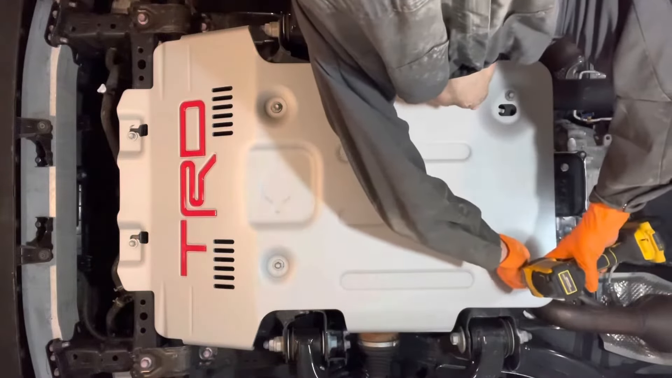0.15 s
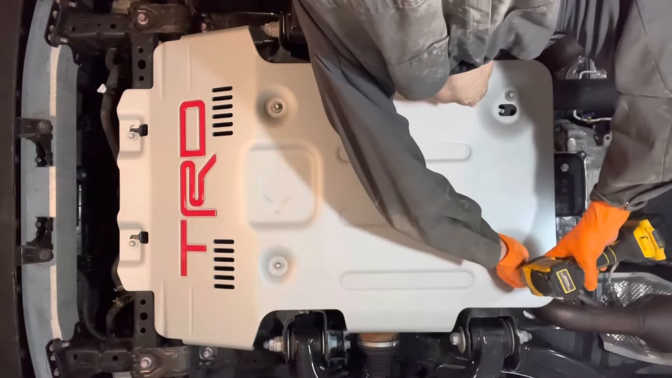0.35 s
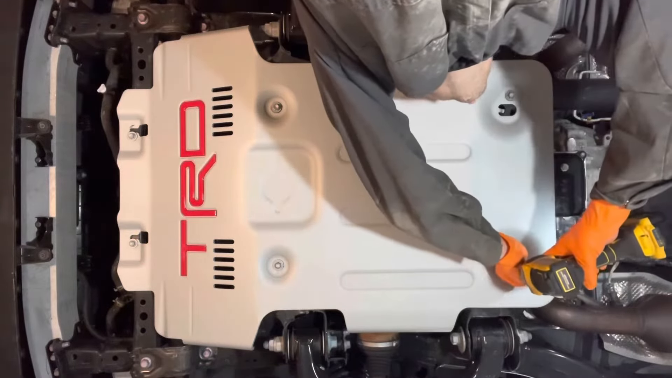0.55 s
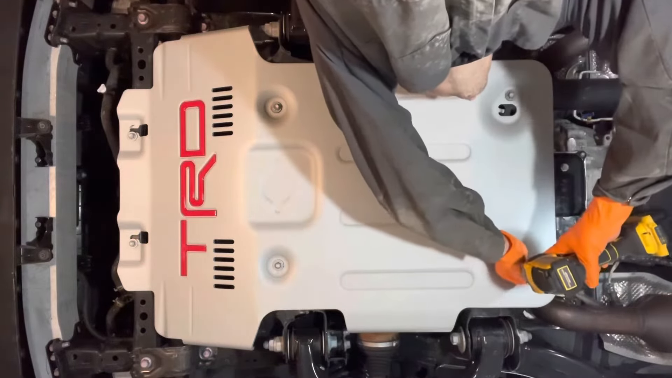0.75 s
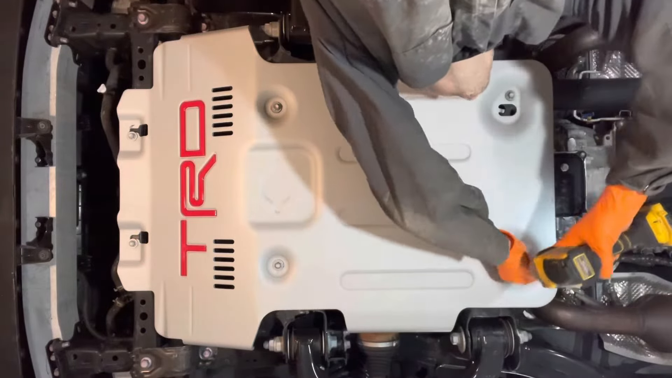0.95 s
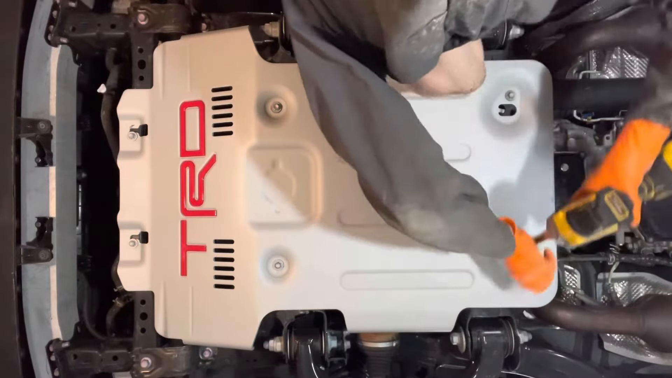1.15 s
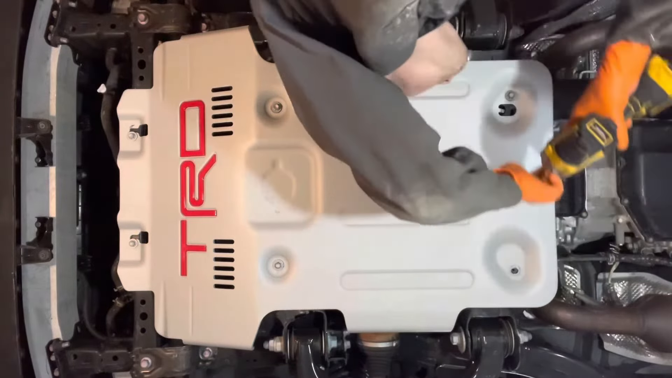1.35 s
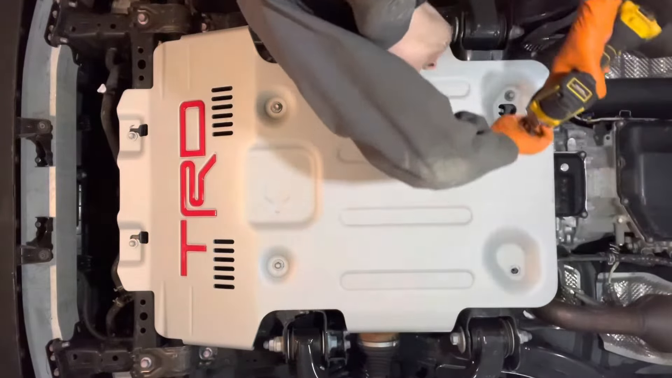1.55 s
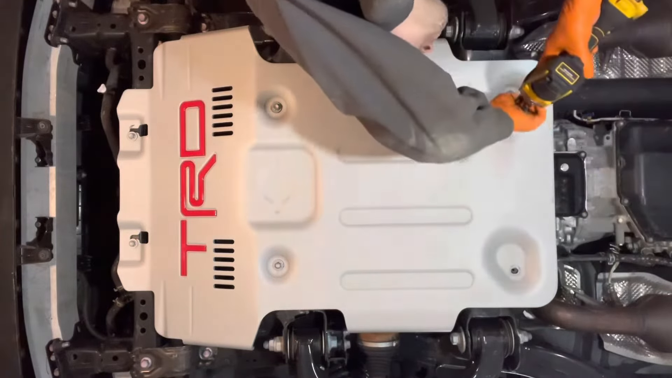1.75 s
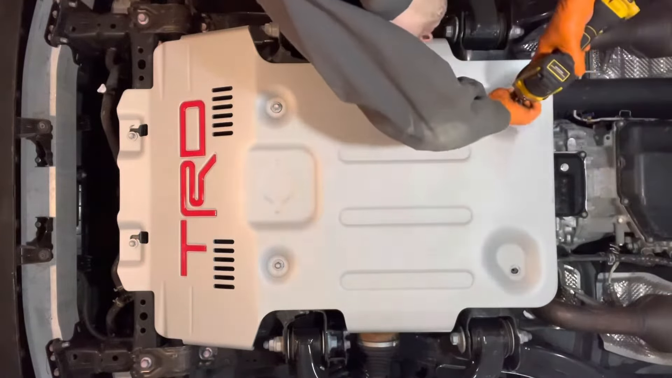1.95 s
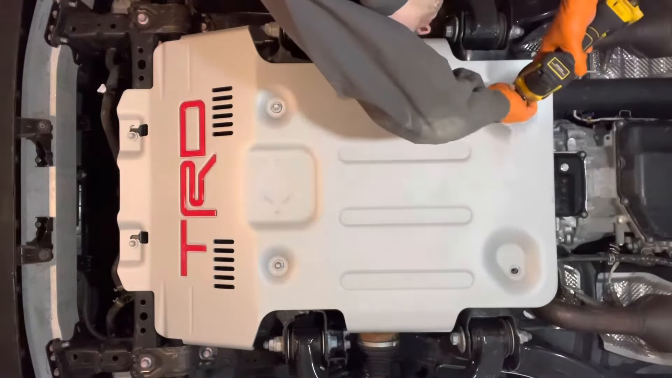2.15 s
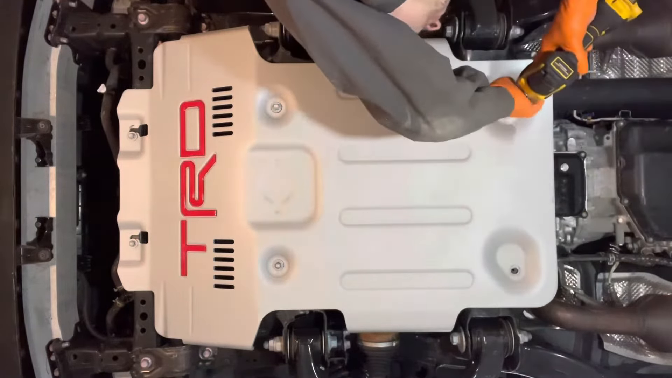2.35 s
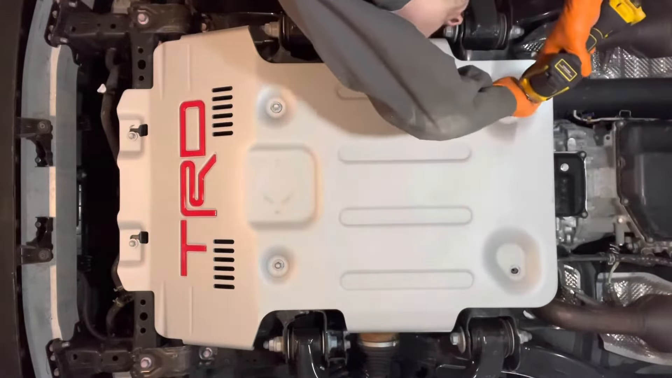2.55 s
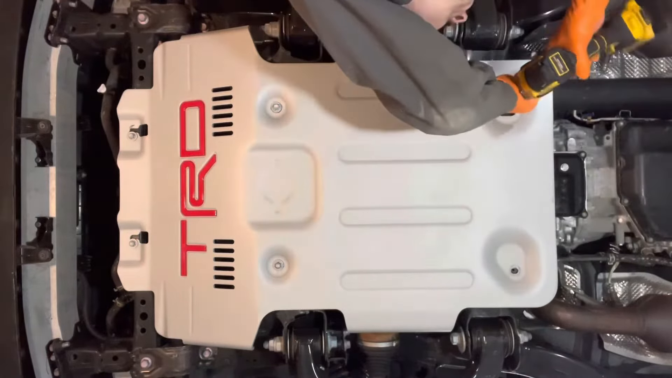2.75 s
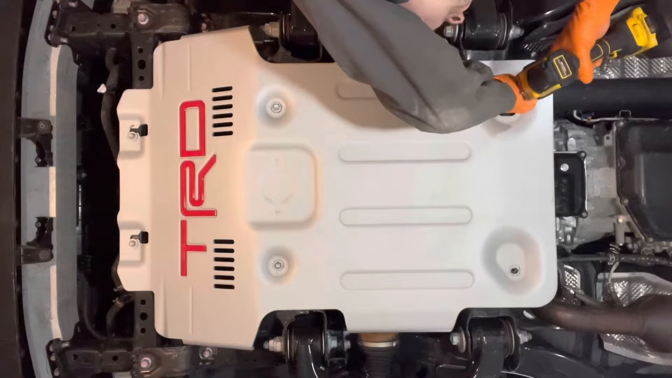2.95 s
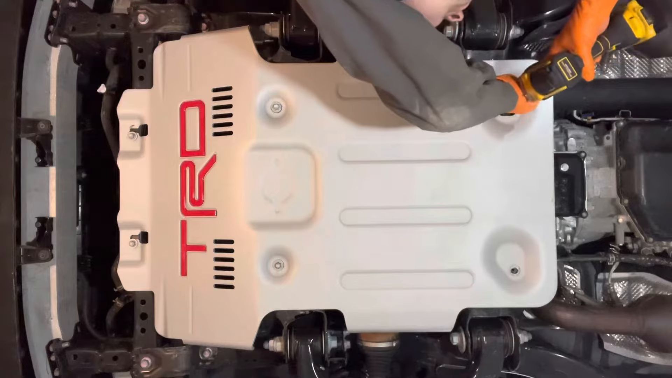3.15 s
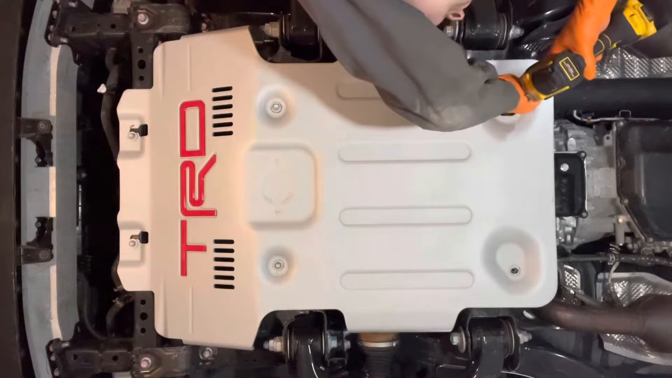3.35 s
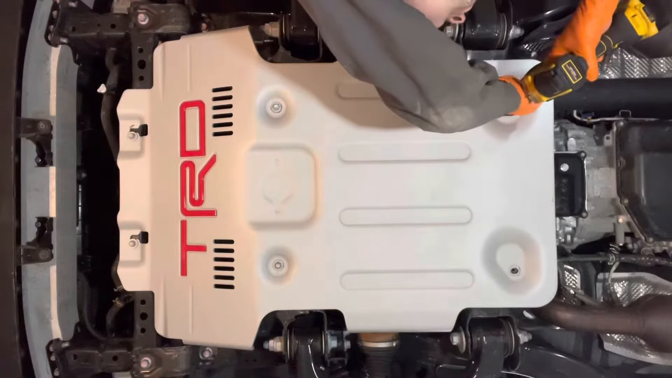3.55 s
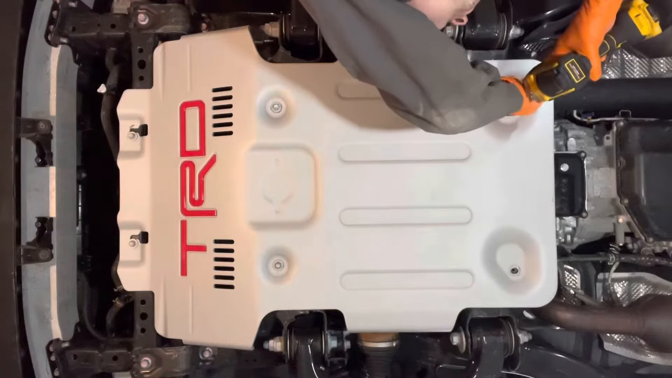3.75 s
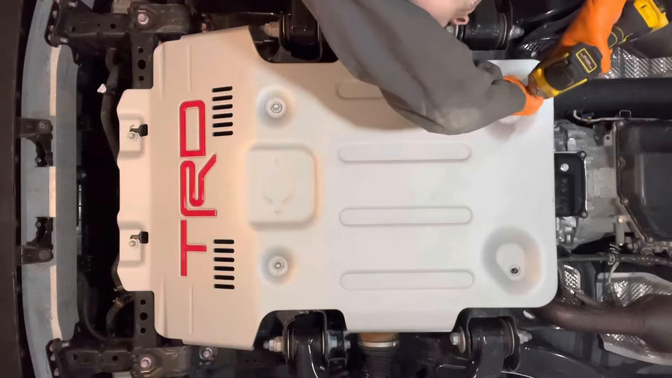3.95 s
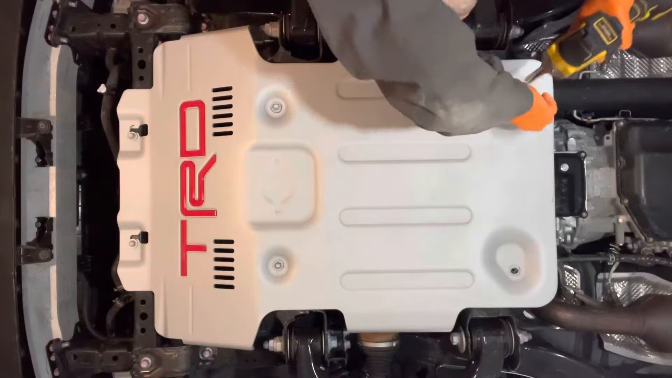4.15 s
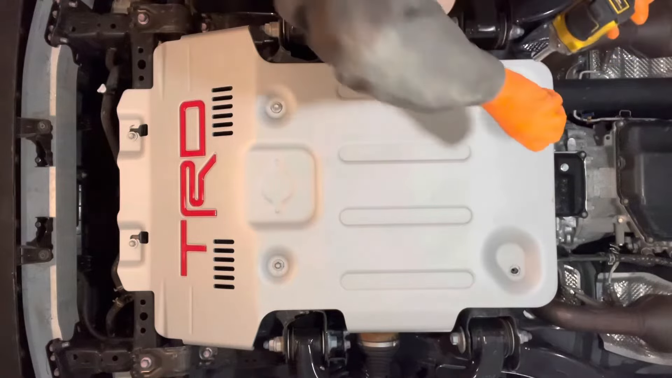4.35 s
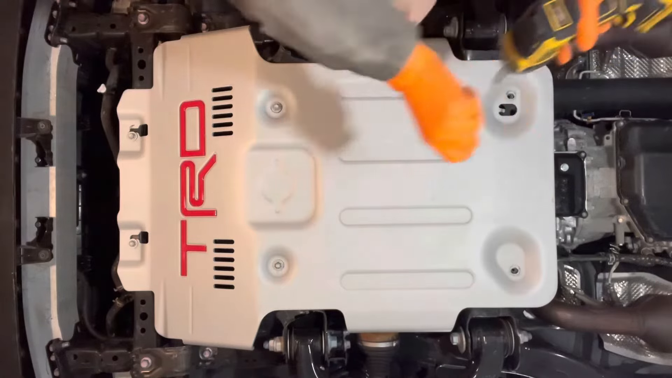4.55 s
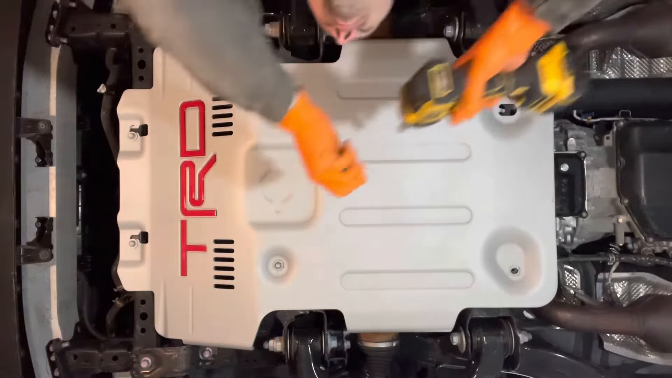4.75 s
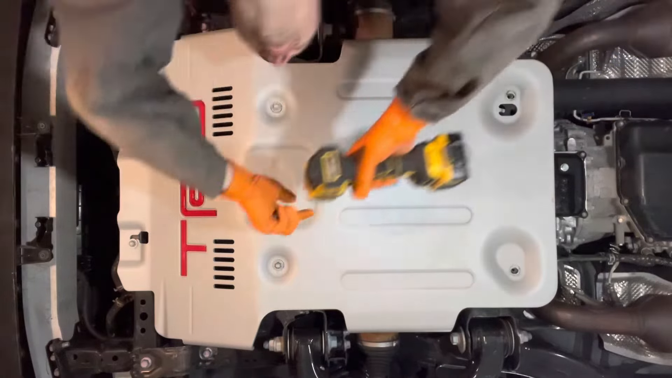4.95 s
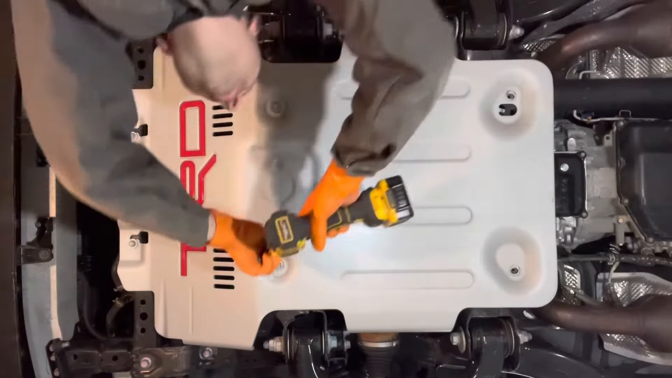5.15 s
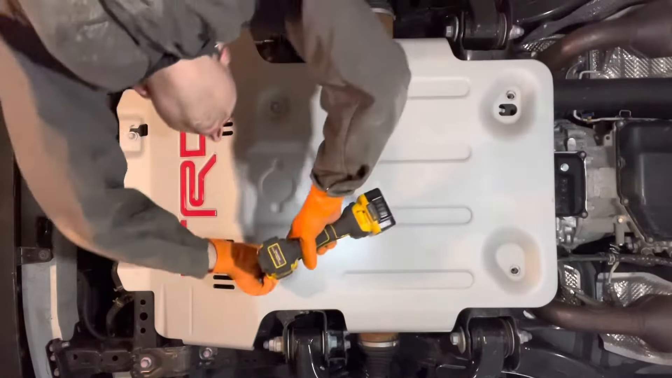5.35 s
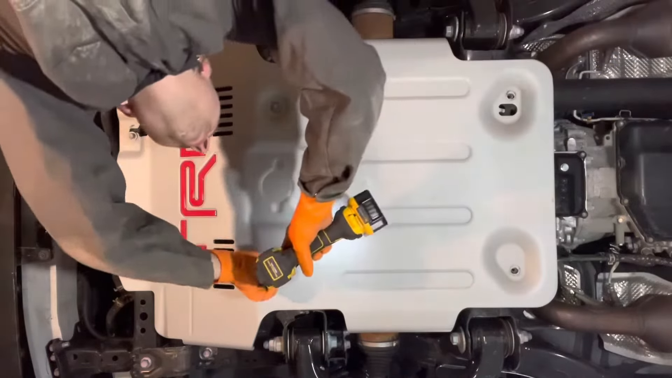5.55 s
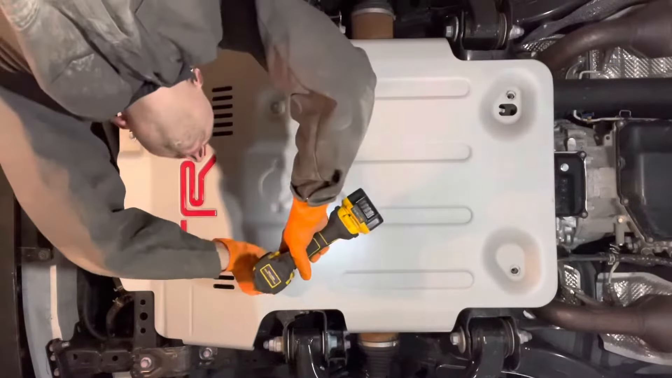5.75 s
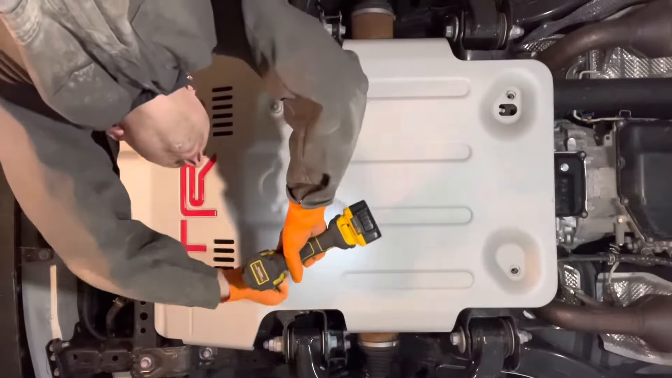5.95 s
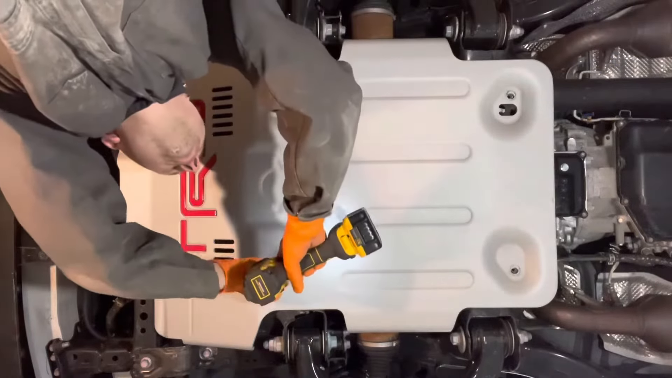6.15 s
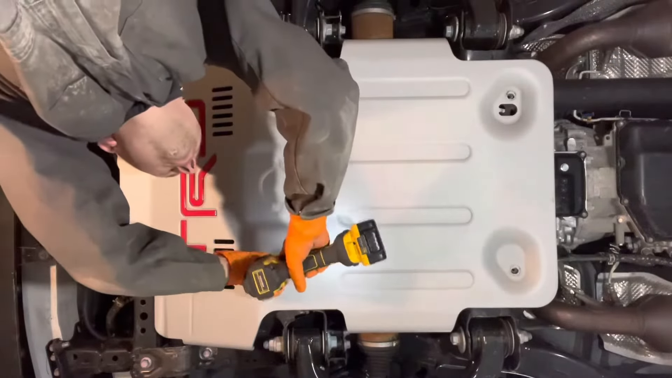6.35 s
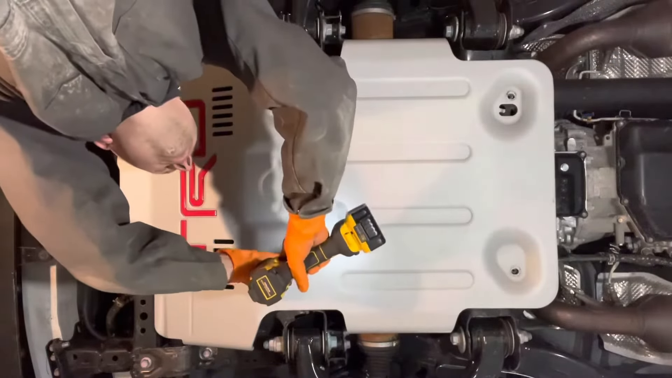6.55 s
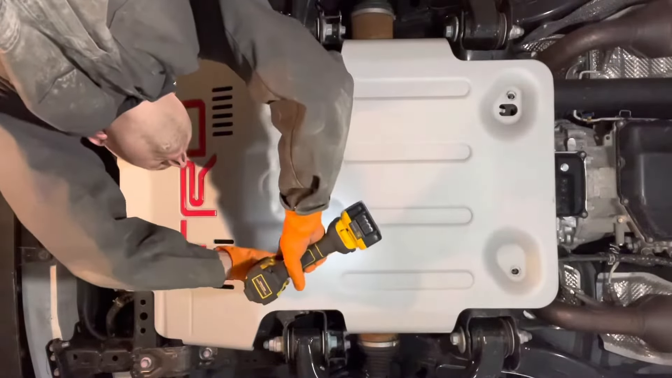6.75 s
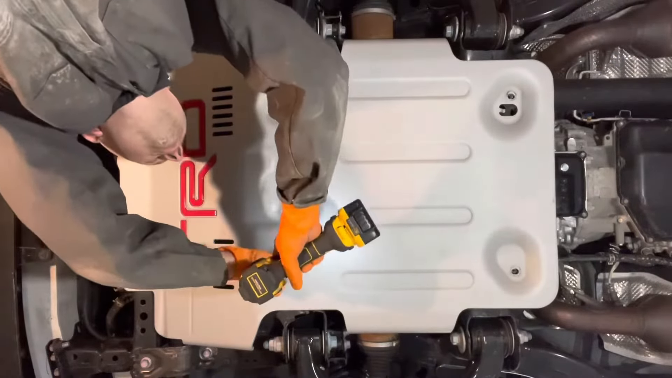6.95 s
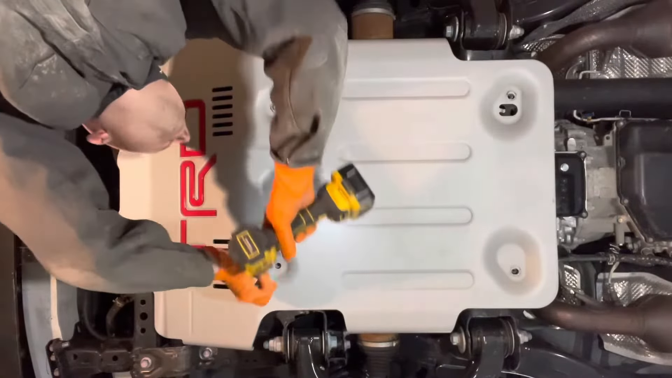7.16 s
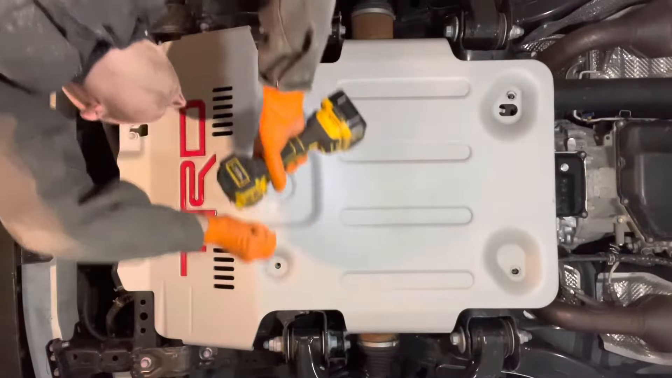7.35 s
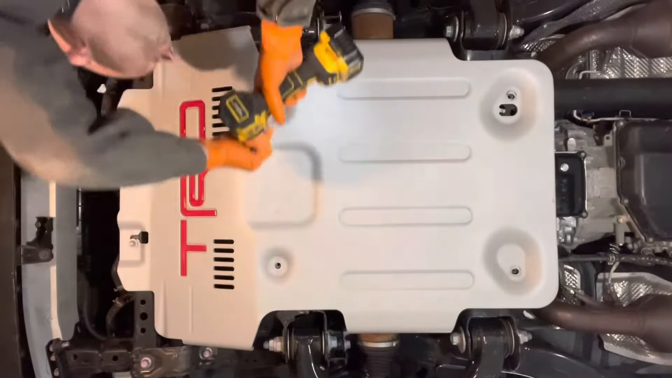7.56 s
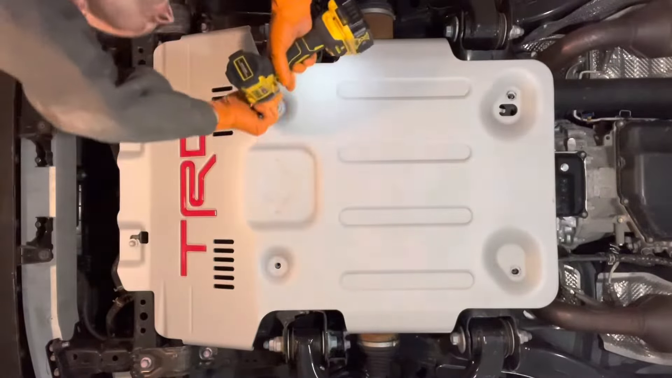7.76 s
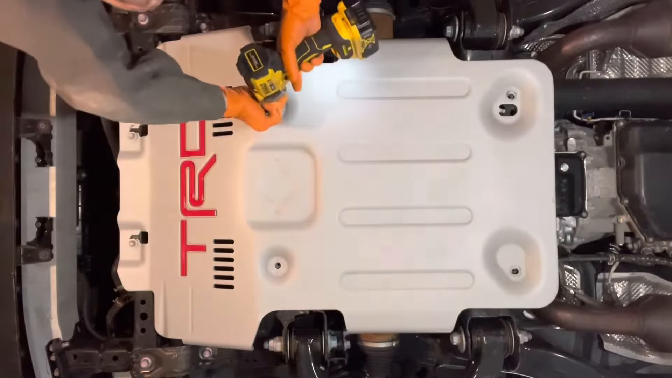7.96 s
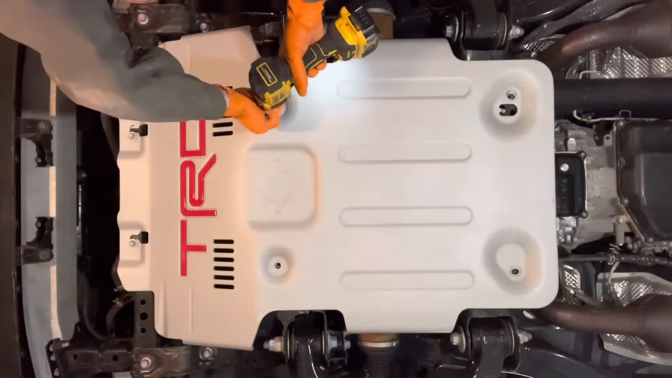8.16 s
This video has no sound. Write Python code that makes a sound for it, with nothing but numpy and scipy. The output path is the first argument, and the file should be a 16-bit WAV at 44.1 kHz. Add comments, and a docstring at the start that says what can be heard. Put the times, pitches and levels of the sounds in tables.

```python
"""A cordless impact driver backs bolts out of an aluminium skid plate under a truck, in a garage.
From the start gear-mesh tones rise over a whirr of filtered noise, and jolted low modes of the plate boom;
sleeves rustle and the socket ticks. Blows then excite the dense modes of the plate, the stalled motor sings
and growls, and a second run begins. More rustling and blows lead to a third run; the rustling after it is
the strongest, and then the steady noise of the room dips briefly and a few last blows sound."""
import sys
import numpy as np
from scipy import signal
from scipy.fft import rfft, irfft, next_fast_len
from scipy.io import wavfile
from scipy.ndimage import uniform_filter1d, map_coordinates

SR = 44100
rng = np.random.default_rng(int(sys.argv[2]) if len(sys.argv) > 2 else 0)


def wav_record(signal):
    """Record a signal, one row per channel, as 16-bit PCM in the file named by sys.argv[1]."""
    frames = np.transpose(np.atleast_2d(signal))
    bounded = np.clip(frames, -1, 1)
    # unit amplitude maps onto the largest positive 16-bit level
    quanta = np.round(bounded * 32767).astype(np.int16)
    wavfile.write(sys.argv[1], SR, quanta)


N = 361619

# Motor runs, one table per burst: (time [s], gear mesh frequency [Hz], whine level [dB],
# first order over whine [dB], relative whirr level [dB], relative treble of the whirr [dB])
RUNS = [
    [(0, 731, -45, 3, -46, -1), (.1, 752, -40, 0, -42, -1), (.325, 815, -35, -6, -39.5, -1),
     (.335, 935, -33, 1, -40, 0), (.365, 948, -34, 1, -40, 0), (.375, 1010, -37, -1, -40, 1),
     (.41, 1026, -34, -3, -41, 1), (.42, 1110, -34, -3, -41, 2), (.455, 1132, -36, -4, -41, 3),
     (.48, 1168, -38, -3, -42, 4), (.6, 1172, -35.5, -1, -42, 5), (.77, 1170, -40, -2, -41, 5),
     (.82, 1170, -51, -8, -51, 0), (.9, 1185, -70, -8, -62, -4)],
    [(2.92, 260, -55, 0, -44, 0), (3.03, 330, -48, 0, -48, -5), (3.07, 395, -44, 0, -47, -3),
     (3.1, 433, -33, 0, -46, -2), (3.165, 442, -38, 0, -45, -1), (3.21, 545, -39, 0, -44, 0),
     (3.27, 595, -42, -8, -45, 1), (3.3, 660, -38, -8, -45, 1), (3.37, 719, -40, 2, -47, 3),
     (3.44, 721, -46, 2, -48, 4), (3.47, 723, -36, -8, -48, 5), (3.6, 730, -37, -6, -49, 6),
     (3.84, 743, -45, -2, -49, 6), (3.89, 735, -55, -4, -49, -8), (3.98, 735, -75, 0, -62, -9)],
    [(6.42, 970, -48, -10, -37, -6), (6.49, 985, -44, -6, -47, -2), (6.6, 1008, -42, 3, -44, 1),
     (6.7, 1040, -38, 5, -42, 4), (6.8, 1051, -35, -7, -45, 5), (6.85, 1153, -30, -16, -45, 5),
     (6.885, 1170, -32, -16, -45, 4), (6.905, 1160, -40, -12, -46, 2), (6.93, 1000, -39, -6, -45, 2),
     (6.95, 600, -46, -6, -49, 1), (7.02, 300, -75, 0, -66, 0)],
]
# Transmission of a gear tone through the housing: (frequency [Hz], gain [dB])
WHINE_PATH = [(270, -18), (720, -11), (870, 0), (1020, -3), (1190, 4), (1450, 0), (2150, 1), (2400, 1),
              (2800, -14), (3500, -20)]
THIRD_DB = -6  # third mesh order over the whine, before transmission
# Orders heard only near housing modes: (mesh order [1], level over the whine [dB])
HIGH_ORDERS = [(4, -3), (11 / 2, -15)]
# Spectrum of the tooth grit in the gearbox: (frequency [Hz], density [dB per Hz])
GEARBOX = [(180, -25), (300, -11), (539, -12), (717, -1), (1740, -1), (2100, 2), (3240, -8.5), (4030, -14),
           (6560, -16.5), (8020, -24), (9330, -18.5), (13500, -22.5), (16500, -81)]
# Housing modes: (frequency [Hz], width [Hz], relative level [dB])
HOUSING = [(2036, 55, -2.5), (2950, 130, -6), (4740, 150, -6), (6470, 110, 8), (6880, 140, 7.5)]
# Housing modes heard as a separate ring: (frequency [Hz], width [Hz], relative level [dB])
HOUSING_RING = [(4010, 38, 0), (4220, 110, -10)]
RING_DB = -3.5  # housing ring over the whirr, before the three terms below
RING_FOLLOWS, RING_DB_PER_OCTAVE = .9, 3  # dB per dB of treble; dB per octave of mesh over 1 kHz
# Housing ring let out by the grip: (first burst [dB], second [dB], third [dB])
BURST_RING_DB = (-3, -3.5, -3.5)
# Mesh orders smeared by uneven teeth: (order [1], width [Hz], relative level in bursts 1, 2, 3 [dB])
SMEARED = [(3, 380, -20, -8, -16), (7 / 2, 130, -11, -30, -26), (5, 320, -26, -11, -22),
           (7, 160, -24, -17, -22), (37 / 4, 380, -30, -11, -28)]
SMEAR_FOLLOWS = 2.2  # dB of band per dB of treble
# Groan of the plate while the thread binds: (time [s], level [dB])
BINDING = [(0, -56), (.1, -42), (.2, -43), (.225, -50), (.25, -40), (.42, -41), (.5, -60), (.6, -80),
           (2.95, -80), (3.05, -49), (3.25, -49), (3.35, -80)]
BINDING_HZ, BINDING_WIDTH_HZ = 1050, 60

# Plate modes heard from each struck bolt:
# (frequency [Hz], relative level at bolt 1 [dB], bolt 2 [dB], bolt 3 [dB])
PLATE = [(475, -10, -18, -20), (590, -2, -18, -20), (670, -8, -18, -18), (711, -7, -7, -9),
         (835, -11, -10, -14), (958, -7, -14, -16), (1010, -14, -3, -14), (1073, -12, -9, -12),
         (1135, -6, -14, -6), (1268, -9, -16, -16), (1497, -18, -14, -14), (1565, -14, -9, -6),
         (1778, -14, -16, -5), (1860, -7, -18, -16), (1945, -6, -14, -8), (2165, -12, -2, -14),
         (2385, -8, -16, -14), (2478, -16, -6, -18), (2603, -16, -16, -12), (2740, -18, -11, -13),
         (2850, -7, -8, -18), (3120, -18, -18, -14), (3270, -14, -5, -9), (3405, -12, -4, -16),
         (3520, -16, -16, -5), (3615, -14, -8, -16), (3890, -16, -7, -10), (4030, -9, -18, -18),
         (4270, -14, -12, -14), (4390, -9, -16, -18), (4620, -14, -16, -9)]
# Jolts by blows, hands and the turning bolt: (time [s], duration [s], t60 [s], deep boom level [dB],
# upper boom level [dB], drum level [dB], rumble level [dB])
JOLTS = [(0, .14, .6, -47, -45, -41, -53), (.08, .64, .7, -47, -46, -47, -57),
         (.5, .2, .5, -45, -40, -39, -64), (1.03, .03, .5, -63, -64, -55, -64),
         (1.95, .12, .8, -53, -47, -48, -64), (2.09, .11, .65, -49, -41, -40, -53),
         (2.635, .1, 1.1, -56, -49, -52, -72), (2.797, .05, .5, -40, -29, -28, -45),
         (3.02, .21, .8, -42, -46, -49, -53), (3.17, .06, .6, -60, -50, -43, -70),
         (3.25, .07, 1.3, -54, -48, -50, -58), (4.38, .05, .5, -67, -64, -66, -67),
         (4.82, .03, .4, -60, -63, -69, -55), (4.92, .09, .3, -60, -59, -55, -58),
         (5.515, .03, .6, -56, -52, -38, -62), (5.6, .11, .5, -55, -54, -50, -56),
         (5.95, .12, .4, -68, -62, -55, -65), (6.245, .07, .55, -39, -34, -24, -52),
         (6.36, .44, .8, -43, -38, -42, -52), (6.545, .08, .5, -42, -26, -44, -49),
         (6.7, .07, .5, -38, -25, -41, -45), (6.79, .08, .6, -36, -30, -46, -55),
         (6.92, .18, 2.2, -37, -45, -56, -58), (7.25, .06, 1.2, -46, -47, -53, -70),
         (7.4, .75, 1.1, -53, -53, -76, -63), (8.0, .04, .6, -54, -54, -50, -58),
         (8.14, .04, .6, -56, -48, -55, -58)]
JOLT_RISE_S = .025
# Decay time over that of the jolt: (deep [ratio], upper [ratio], drum [ratio], rumble [ratio])
RING_SHARE = (1.05, .9, .55, .55)
# Levels while nothing touches the plate: (deep [dB], upper [dB], drum [dB], rumble [dB])
AT_REST_DB = (-69, -72, -73, -73)
# Slowly damped deep modes of the plate: (frequency [Hz], relative level [dB])
DEEP = [(84, -4), (110, 0.5)]
# Slowly damped upper modes of the plate: (frequency [Hz], relative level [dB])
UPPER = [(133, 0.5), (178, -3)]
# Drum-like modes of the plate: (frequency [Hz], width [Hz], relative level [dB])
DRUM = [(218, 20, -3), (252, 27, 0.5), (281.5, 14, 0.5), (314.7, 38, -1.5), (375.8, 19, -5)]
# Single plate modes left ringing: (time [s], frequency [Hz], level [dB], t60 [s])
RINGING = [(.52, 135, -38, 1.1), (1.33, 1540, -68, 1.5), (3.25, 128, -38, 1.6), (3.3, 252, -60, 6),
           (5.53, 378, -58, 2.5), (5.62, 178, -43, .5), (5.97, 178, -53, .9), (6.3, 378, -45, 1.8),
           (6.47, 178, -32, 1.5), (8.0, 178, -46, .9)]
RINGING_RISE_S = .03

# Rubs of sleeves and gloves: (time of maximum [s], rise [s per 10 dB], fall [s per 10 dB],
# relative body level [dB], relative hiss level [dB])
RUBS = [(.95, .1, .2, -66, -72), (1.052, .05, .08, -57, -58), (1.155, .04, .1, -61, -59),
        (1.33, .15, .2, -61, -67), (1.53, .05, .08, -62, -77), (1.73, .15, .15, -63, -70),
        (2.3, .02, .15, -60, -72), (2.45, .05, .15, -62, -72), (4.096, .015, .04, -63, -65),
        (4.364, .08, .12, -65, -61), (4.2, .1, .2, -65, -80), (4.47, .15, .2, -64, -75),
        (4.72, .04, .04, -74, -65), (4.845, .04, .1, -65, -63), (5.024, .13, .08, -54, -64),
        (5.278, .09, .06, -57, -65), (5.085, .1, .05, -66, -62), (5.41, .03, .2, -66, -57),
        (5.46, .06, .05, -58, -57), (5.87, .1, .05, -59, -64), (6.09, .05, .08, -62, -68),
        (7.22, .03, .15, -52, -50), (7.32, .1, .12, -50, -45.5), (7.53, .03, .18, -60, -70)]
# Spectrum of the body of a rub: (frequency [Hz], density [dB per Hz])
CLOTH = [(180, -8), (300, -2.5), (1010, -6), (1370, -10.5), (1490, -8.5), (1790, -13), (4000, -34),
         (5200, -48), (8800, -120)]
# Spectrum of the hiss of a rub: (frequency [Hz], density [dB per Hz])
HISS = [(1180, -22), (2000, 0), (2280, -3), (3460, -3), (11300, -11), (14600, -20), (15600, -14),
        (16500, -88)]
# Light contacts of socket and hands: (time [s], relative level [dB], frequency [Hz], t60 [s])
TICKS = [(1.05, -46, 4660, 0.045), (1.145, -35, 9500, .02), (1.311, -39, 950, 0.04),
         (1.532, -46, 600, 0.029), (4.353, -33, 7280, 0.023), (4.543, -53, 6150, 0.031),
         (4.722, -43.5, 5150, 0.012), (4.995, -41, 600, .02), (5.015, -34, 600, 0.025),
         (5.087, -52, 8000, .03), (5.338, -52, 9000, .015), (6.771, -24.5, 6200, 0.01),
         (7.309, -32, 420, 0.078), (7.504, -37.5, 8000, .02), (7.663, -50, 6000, .02)]

# Metal blows on the plate: (time [s], relative level [dB], relative thud [dB], relative edge [dB],
# relative snap [dB], t60 of the clang band [s], strongest frequency [Hz])
BLOWS = [(1.938, -36, -10, -15, -35, .1, 1300), (1.9515, -19, -6, -16, -35.5, 0.15, 1180),
         (1.9674, -21, -13.5, -12, -36.5, 0.17, 1860), (2.03, -32, -21, -6, -17, 0.18, 1000),
         (2.0887, -21.5, 6, -19.5, -37.5, 0.078, 900), (2.1014, -35, 4.5, -22, -40, 0.23, 956),
         (2.8012, -7, 0.5, -21.5, -37, 0.088, 1160), (2.811, -12, -3, -12, -30, 0.1, 900),
         (2.842, -18, -6, 4, -26, .1, 2400), (2.8512, -10, -3, 4, -3.5, 0.11, 1150),
         (2.8654, -17, -13, -9, -11, 0.15, 2360), (5.501, -29, -20, -10, -25, .1, 2000),
         (5.5128, -12, -24, -8.5, -27.5, 0.19, 1130), (5.5344, -13.5, -25, -15, -35, 0.11, 1580),
         (5.572, -25, -20, -3, -22, .15, 2100), (5.5897, -20.5, -8.5, -4.5, -24.5, 0.15, 1000),
         (5.683, -28, -12, -4, -18, 0.22, 2140), (5.883, -38, -15.5, -18.5, -16, 0.3, 1880),
         (5.944, -34, -10, -8, -25, .15, 1500), (5.953, -26.5, -10, -11, -29, 0.15, 970),
         (5.963, -27.5, -12, -6, -30, .2, 1000), (6.224, -40, -22.5, -8.5, -20, 0.41, 1220),
         (6.231, -31, -20, -10, -18, .3, 1500), (6.2492, -13, -16.5, -12, -7.5, 0.15, 1700),
         (6.2644, -13, -12.5, -9.5, -28.5, 0.22, 1540), (6.2871, -4.5, -11, -15, -32.5, 0.1, 1430),
         (6.2994, -12, 2, -13, -15, 0.12, 2110), (6.3114, -9.5, -23.5, -2, -3, 0.15, 2150),
         (6.3205, -7, -8, -39, -22.5, 0.13, 1100), (6.3674, -16, -17, 1.5, 0, 0.17, 1860),
         (6.9242, -24.5, -32, -12, -11.5, 0.13, 2050), (7.975, -41, -25, -10, -30, .2, 2000),
         (7.9968, -18, -25, -12, -30, .15, 1500), (8.0022, -14, -28, -17, -33, 0.24, 1160),
         (8.0134, -17.5, -11, -8, -39.5, 0.084, 1130), (8.146, -29, -23, -5, -18, .1, 2000),
         (8.1525, -15, -23, -4, -14, 0.18, 1550), (8.1794, -19, -27, -15, -37, 0.07, 1130)]
# Times from which the next bolt is struck: (second bolt [s], third bolt [s])
NEXT_BOLT_S = (5, 7.5)
# Lowest band of a blow: (frequency [Hz], density [dB per Hz])
THUD = [(200, -89), (330, -24), (450, -8), (560, -2), (700, -1), (900, -6.5), (1400, -35), (3000, -89)]
# Middle band of a blow: (frequency [Hz], density [dB per Hz], before the tilt about its strongest pitch)
CLANG = [(300, -90.5), (550, -19), (950, -5), (1200, 0.5), (1400, -1), (1600, -2.5), (1850, -0.5),
         (2150, 0), (2700, -7), (4200, -21.5), (9000, -81)]
# Band above the clang: (frequency [Hz], density [dB per Hz])
EDGE = [(1000, -89.5), (1700, -31.5), (2600, -1.5), (3500, -5.5), (4600, -4), (7000, -15.5), (14000, -82)]
# Highest band of a blow: (frequency [Hz], density [dB per Hz])
SNAP = [(1800, -91), (3500, -25), (6000, -5), (8500, 0), (12000, -4.5), (15500, -10), (17000, -41)]
FIRM_DB, FIRM_RISE_S, SLOWER_PER_DB = -27, .0014, .0013  # contacts below FIRM_DB rise slower, s per dB
CRACK_FOLLOWS = .25  # dB of first crack per dB of snap: dull blows have hardly any

# Stalled motor winding the hammer spring:
# (time [s], song level [dB], growl level [dB], relative whirr level [dB])
WINDING = [(2.475, -76, -90, -90), (2.49, -63, -90, -90), (2.622, -75, -90, -90), (2.63, -54, -75, -70),
           (2.638, -53, -56, -64), (2.65, -56, -46, -57), (2.69, -55, -61, -59), (2.73, -48.5, -41.5, -50),
           (2.77, -50, -29, -41), (2.8, -48, -35.5, -34), (2.82, -48, -42, -50), (2.9, -69, -70, -80)]
# Growl resonances: (frequency [Hz], width [Hz], relative level [dB])
GROWL = [(590, 40, -6), (736, 130, -3), (1120, 380, -1.5)]
SWITCHING_HZ = 4260
WINDING_TREBLE_DB, WINDING_RING_DB = -10, -18

# Position of the tool: (time [s], left minus right [dB])
SIDEWAYS = [(0, 0), (.64, -1.5), (1.12, 2), (1.6, -3), (2.12, 0), (3.2, -1), (3.9, -1), (4.4, 3.5),
            (5.0, 2), (5.8, -1), (6.78, -.5), (7.6, 2), (8.2, 1.5)]
# Scattering by the chassis: (frequency [Hz], relative side over mid [dB])
SCATTER = [(60, -18), (130, -14.5), (290, -5.5), (640, -4.5), (1410, -3.5), (3100, -1.5), (6820, 1.5),
           (15000, -2)]
# Reverberation of the garage: (frequency [Hz], t60 [s])
GARAGE = [(200, 0.31), (2000, 0.63), (10000, 0.17)]
# Hush of the garage: (frequency [Hz], density [dB per Hz])
AIR = [(180, -27.5), (300, -1.5), (433, -16), (978, -14), (8360, -24), (13800, -30), (16000, -52.5)]
# Brief fade of the hush: (time [s], gain [dB])
HUSH_DIPS = [(7.72, 0), (7.82, -9), (7.99, -10), (8.0, 0)]
AIR_DB = -68  # level of the hush outside its dip
TOP_HZ = 16750


def amp(db):
    """Decibel law: the amplitude ratio of a level."""
    return 10 ** (np.asarray(db) / 20)


def unit(x):
    """Normalisation to an rms of 1."""
    return x / np.sqrt(np.mean(x ** 2) + 1e-20)


def along(points, hz):
    """Interpolation of (frequency [Hz], value) points on a logarithmic frequency axis."""
    f, v = np.transpose(points)
    return np.interp(np.log(hz + 1), np.log(f + 1), v)


def curves(rows):
    """Linear interpolation in time of each column after the first, one value per sample."""
    s, *cols = np.transpose(rows)
    return np.array([np.interp(np.arange(N) / SR, s, c) for c in cols])


def during(rows, per_s=100):
    """Gating: 1 inside the table's time span, with short linear fades outside it."""
    t = np.arange(N) / SR
    return np.clip(np.minimum(t - rows[0][0], rows[-1][0] - t) * per_s + 1, 0, 1)


def wobble(rate, size=N):
    """Random modulation: a smooth curve through rate random knots a second."""
    knots = rng.standard_normal(int(size * rate / SR) + 4)
    return map_coordinates(knots, [np.arange(size) * rate / SR])


def filtered(x, response):
    """Linear filtering: the spectrum of x times a response of frequency."""
    n = x.shape[-1]
    m = next_fast_len(n + 8192)  # room for the tail
    return irfft(rfft(x, m) * response(np.fft.rfftfreq(m, 1 / SR)), m)[..., :n]


def modes(table):
    """Modal superposition: response of a sum of (frequency [Hz], width [Hz], level [dB]) resonances."""
    return lambda f: sum(amp(db) * 1j * f * w / (c * c - f * f + 1j * f * w) for c, w, db in table)


def coloured(spectrum, shape):
    """Spectral shaping: noise of rms 1 with the given spectrum."""
    return unit(filtered(rng.standard_normal(shape), lambda hz: amp(along(spectrum, hz))))


def hush():
    """Diffuse background: independent steady noise in each channel, with a brief dip."""
    return amp(AIR_DB + curves(HUSH_DIPS)[0]) * coloured(AIR, (2, N))


def whine():
    """Gear-mesh harmonics: orders of the tooth frequency, the two highest selected by housing modes."""
    out = np.zeros(N)
    for rows in RUNS:
        gate = during(rows)
        on = gate > 0
        hz, whine_db, first_db = curves(rows)[:3, on]
        waver = lambda rate: wobble(rate, size=len(hz))
        phase = 2 * np.pi * np.cumsum(hz * (1 + 0.00623 * waver(60))) / SR
        orders_db = [db + along(WHINE_PATH, (k + 1) * hz) for k, db in enumerate((first_db, 0, THIRD_DB))]
        housing = modes(HOUSING + HOUSING_RING)
        orders_db += [db + 20 * np.log10(np.abs(housing(order * hz))) for order, db in HIGH_ORDERS]
        for order, db in zip((1, 2, 3, *np.transpose(HIGH_ORDERS)[0]), orders_db):
            flutter = amp(2.3 * waver(25)) * (1 + .45 * waver(160))  # uneven teeth blur each line
            tone = np.sin(order * phase + 0.32 * waver(120))
            out[on] += gate[on] * amp(whine_db + db) * flutter * tone
    return out


def patchy(x, depth_db):
    """Random band modulation: narrow bands swell and fade at random."""
    z = signal.stft(x, nperseg=1024)[2]
    field = uniform_filter1d(rng.standard_normal(z.shape), size=3, axis=0)  # over frequency
    field = uniform_filter1d(field, size=5, axis=1)  # over time
    return signal.istft(z * amp(depth_db * unit(field)), nperseg=1024)[1][:N]


def grit_layers(grit, sheet):
    """Forced resonance: grit excites housing and plate; returns low, high and ringing layers."""
    coupling = lambda hz: 1 + np.abs(modes(HOUSING)(hz)) + np.abs(sheet(hz))
    body = filtered(grit, lambda hz: amp(along(GEARBOX, hz)) * coupling(hz))
    body = patchy(body, depth_db=3)
    low = filtered(body, lambda hz: 1 / (1 + (hz / 3800) ** 8))
    ring = unit(filtered(grit, modes(HOUSING_RING))) * amp(1.5 * wobble(14))
    return unit(low), unit(body - low), ring


def whirr(layers, db, treble_db, ring_db):
    """Superposition of the three grit layers at their levels."""
    low, high, ring = layers
    return amp(db) * (amp(5.5) * low + amp(treble_db) * high + amp(ring_db) * ring)


def smeared(order, width_hz, hz):
    """Quadrature modulation: a band of noise rides on one order of the mesh."""
    phase = 2 * np.pi * order * np.cumsum(hz) / SR
    in_phase = wobble(width_hz, size=len(hz)) * np.cos(phase)
    return in_phase + wobble(width_hz, size=len(hz)) * np.sin(phase)


def gear_noise(layers):
    """Broadband excitation: each run whirrs, with noise bands that follow its mesh orders."""
    out = np.zeros(N)
    for burst, rows in enumerate(RUNS):
        hz, _, _, whirr_db, treble_db = curves(rows)
        ring_db = RING_DB + BURST_RING_DB[burst] + RING_FOLLOWS * treble_db
        ring_db = ring_db + RING_DB_PER_OCTAVE * np.log2(hz / 1000)
        gate = during(rows)
        out += gate * whirr(layers, whirr_db, treble_db, ring_db)
        on = gate > 0
        bands = sum(amp(dbs[burst]) * smeared(order, width, hz[on]) for order, width, *dbs in SMEARED)
        out[on] += (gate * amp(whirr_db + SMEAR_FOLLOWS * treble_db))[on] * bands
    return out


def groan(grit):
    """Resonant selection: while the thread binds, grit excites one mode of the plate."""
    mode = modes([(BINDING_HZ, BINDING_WIDTH_HZ, 0)])
    return amp(curves(BINDING)[0] + 2.5 * wobble(18)) * unit(filtered(grit, lambda hz: mode(hz) ** 2))


def driver():
    """Source and resonator: gear tones and grit act on the housing and, through the bolt, on the plate."""
    grit = rng.standard_normal(N) * amp(1.5 * wobble(300) + 1.3 * wobble(30))
    mean_db = np.mean(np.array(PLATE)[:, 1:], axis=1)  # over the three bolts
    sheet = modes([(row[0], 40, db - 2.5) for row, db in zip(PLATE, mean_db)])
    tones = whine()
    tones = tones + filtered(tones, sheet)  # the whine swells where it crosses a plate mode
    layers = grit_layers(grit, sheet)
    return tones + gear_noise(layers) + groan(grit) + winding(grit, layers)


def echoes(t60, seconds):
    """Exponential decay: two noise tails of about energy 1, each frequency dying at its own speed."""
    hz, t, z = signal.stft(rng.standard_normal((2, int(SR * seconds))), SR, nperseg=256)
    tail = signal.istft(z * amp(-60 * t / along(t60, hz)[:, None]), SR, nperseg=256)[1]
    return tail / np.linalg.norm(tail[0])


def chassis(x, size=4096):
    """Scattering: the chassis close above sends sound left or right by paths that change block by block."""
    side, padded = np.zeros(N + 4 * size), np.pad(x, (size, 2 * size))
    for k in range(0, N + size, size):
        piece = padded[k:k + 2 * size] * np.sqrt(np.hanning(2 * size))
        near = signal.fftconvolve(piece, echoes([(200, 0.26), (8000, .04)], seconds=.08)[0])
        side[k:k + len(near)] += near
    side = filtered(side[size:size + N], lambda hz: amp(along(SCATTER, hz) - 2.2))
    return np.array([x + side, x - side])


def garage(x):
    """Reverberation: convolution with a decaying noise tail for each channel."""
    return signal.fftconvolve(np.pad(x, (600, 0))[None], echoes(GARAGE, seconds=.8), axes=1)[:, :N]


def shaking():
    """Energy addition: each jolt rises, lasts and decays, and the powers sum; gains of four low layers."""
    t = np.arange(0, N + 64, 64) / SR
    power = amp(np.multiply(AT_REST_DB, 2))[:, None]
    for s, lasts, t60, *dbs in JOLTS:
        rise = np.clip((t - s) / JOLT_RISE_S, 0, 1)
        fall_db = -60 * np.clip(t - s - lasts, 0, None) / (t60 * np.array(RING_SHARE)[:, None])
        power = power + (rise * amp(np.array(dbs)[:, None] + fall_db)) ** 2
    return [np.interp(np.arange(N) / SR, t, p ** .5) * amp(1.8 * wobble(16)) for p in power]


def boom(table):
    """Low modal vibration: tones waver in phase and strength, a little differently in each channel."""
    t = np.arange(N) / SR
    tones = 0
    for hz, db in table:
        strength = amp(db + 2.7 * wobble(6))
        phase = 1.2 * wobble(8) + .14 * wobble(4) * [[1], [-1]]
        tones = tones + strength * np.sin(2 * np.pi * hz * t + phase)
    resonances = modes([(hz, 30, db) for hz, db in table])
    blur = filtered(rng.standard_normal(N), lambda f: resonances(f) ** 2)
    return unit(unit(tones) + .6 * unit(blur))  # panels nearby blur the tones


def plate():
    """Random vibration: shaking excites the low plate modes, over a rumble partly separate per channel."""
    deep, upper, drumming, rumbling = shaking()
    drum = unit(filtered(rng.standard_normal(N), lambda hz: modes(DRUM)(hz) ** 2))
    spread = .45 * unit(filtered(rng.standard_normal(N), modes(DRUM))) * [[1], [-1]]
    # (frequency [Hz], density [dB per Hz])
    low = [(5, -59.5), (18, -23.5), (36, -13), (52, -1), (64, -6), (85, -41), (200, -100)]
    rumble = coloured(low, N) + .33 * coloured(low, N) * [[1], [-1]]
    return deep * boom(DEEP) + upper * boom(UPPER) + drumming * (drum + spread) + rumbling * rumble


def ringing():
    """Free vibration: each single mode swells quickly and decays as a slightly unsteady tone."""
    out, t = np.zeros(N + 2 * SR), np.arange(2 * SR) / SR
    for s, hz, db, t60 in RINGING:
        decay = amp(db + 1.5 * wobble(15, size=len(t)) - 60 * t / t60)
        ends = (1 - np.exp(-t / RINGING_RISE_S)) * np.clip(10 * (t[-1] - t), 0, 1)
        tone = np.sqrt(2) * np.sin(2 * np.pi * hz * t + .5 * wobble(10, size=len(t)))
        out[round(s * SR):][:len(t)] += decay * ends * tone
    return out[:N]


def cloth(spectrum):
    """Friction noise: uneven patches of noise, partly common to both channels."""
    patches = amp(1.14 * wobble(25) + 1.5 * wobble(140))
    return patches * (coloured(spectrum, N) + 1.24 * coloured(spectrum, (2, N)))


def rustle():
    """Friction: each rub of cloth swells and fades evenly in dB, and the powers of the rubs add."""
    t, power = np.arange(0, N + 64, 64) / SR, 0
    for s, rise, fall, *dbs in RUBS:
        drop_db = 10 * np.maximum((s - t) / rise, (t - s) / fall)
        power = power + amp(np.array(dbs)[:, None] - drop_db) ** 2
    body_gain, hiss_gain = (np.interp(np.arange(N) / SR, t, p ** .5) for p in power)
    return body_gain * cloth(CLOTH) + hiss_gain * cloth(HISS)


def ticks():
    """Damped impulse noise: short decaying puffs in one broad resonance."""
    out, t = np.zeros(N + SR), np.arange(SR // 8) / SR
    for s, db, hz, t60 in TICKS:
        puff = unit(filtered(rng.standard_normal(len(t)), lambda f: modes([(hz, .7 * hz, 0)])(f) ** 2))
        out[round(s * SR):][:len(t)] += amp(db - 5.5 - 60 * t / t60) * puff
    return out[:N]


def blows():
    """Impact excitation: a blow shakes dense modes, which drive the plate's own modes, and a bright snap."""
    out, t = np.zeros(N + SR), np.arange(SR // 2) / SR
    fall = lambda t60: amp(-60 * t / t60) + amp(-18 - 60 * t / (3 * t60))  # quick loss, weak after-ring
    for s, db, thud_db, edge_db, snap_db, t60, top_hz in BLOWS:
        clang = [(hz, level - 7 * abs(np.log2(hz / top_hz))) for hz, level in CLANG]
        bands = ((thud_db, THUD, 1.2), (0, clang, 1), (edge_db, EDGE, .85))  # higher bands die sooner
        dense = sum(amp(d) * fall(k * t60) * coloured(c, len(t)) for d, c, k in bands)
        bolt = np.searchsorted(NEXT_BOLT_S, s)
        struck = [(hz, 13 + 0.003 * hz, levels[bolt] + rng.normal(0, 1.5)) for hz, *levels in PLATE]
        ring = amp(6.5) * filtered(dense, modes(struck))
        rise_s = FIRM_RISE_S + SLOWER_PER_DB * max(FIRM_DB - db, 0)  # lighter contacts scrape in
        onset = 1 - np.exp(-t / rise_s)
        crack = amp(6 + CRACK_FOLLOWS * snap_db - 60 * t / 0.016) * (1 - np.exp(-3 * t / rise_s))
        snap = amp(snap_db) * (crack + amp(-8 - 60 * t / (0.85 * t60)) * onset)
        blow = (amp(-9) * dense + ring) * onset + snap * coloured(SNAP, len(t))
        out[round(s * SR):][:len(t)] += amp(db - 4.3) * blow
    return out[:N]


def winding(grit, layers):
    """Narrow-band excitation: the stalled motor sings high, growls and whirrs as it winds the spring."""
    song = unit(filtered(rng.standard_normal(N), modes([(SWITCHING_HZ, 260, 0)])))
    growl = unit(filtered(grit, lambda hz: modes(GROWL)(hz) ** 2))
    song_db, growl_db, whirr_db = curves(WINDING)
    out = amp(song_db + 3.6 * wobble(88)) * song + amp(growl_db) * growl
    return during(WINDING) * (out + whirr(layers, whirr_db, WINDING_TREBLE_DB, WINDING_RING_DB))


def scene():
    """Superposition: tool and blows pass chassis and garage; boom and cloth are close, over the hush."""
    tool = driver() + blows() + ticks()
    pan_db = curves(SIDEWAYS)[0]
    panned = (chassis(tool) + amp(-9.5) * garage(tool)) * amp([pan_db / 2, -pan_db / 2])
    return panned + plate() + ringing() + rustle() + hush()


def record(dry):
    """Saturation and band limiting: the highest peaks are rounded and nothing is kept above TOP_HZ."""
    soft = dry / (1 + np.abs(dry / .95) ** 8) ** (1 / 8)
    return filtered(soft, lambda hz: hz < TOP_HZ)


dry = scene()
out = record(dry)
wav_record(out)
```